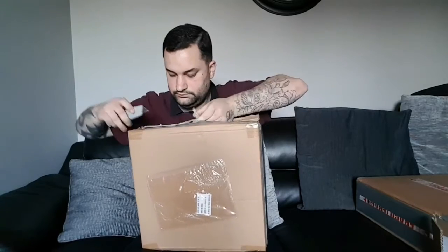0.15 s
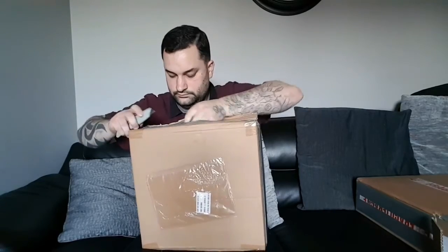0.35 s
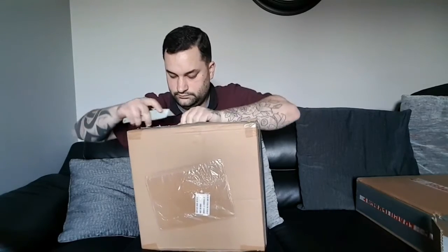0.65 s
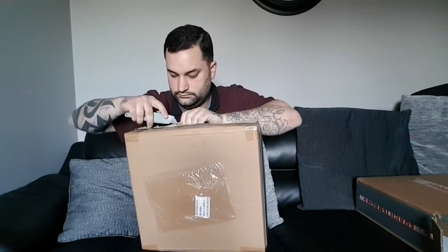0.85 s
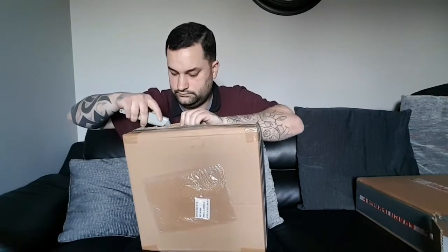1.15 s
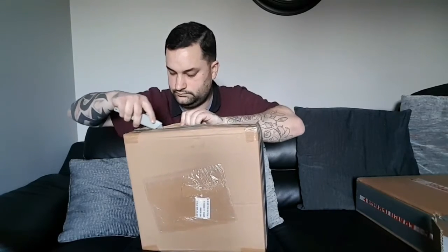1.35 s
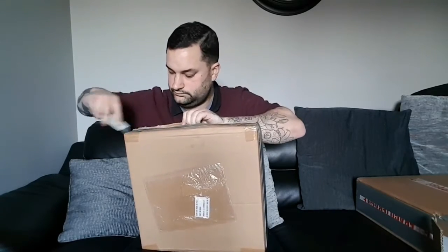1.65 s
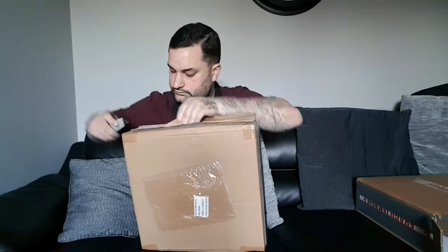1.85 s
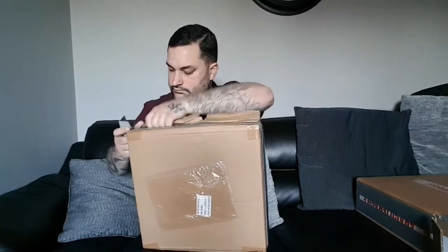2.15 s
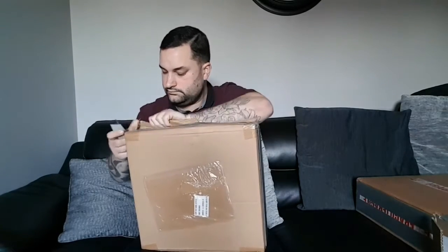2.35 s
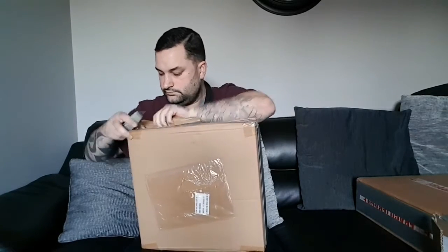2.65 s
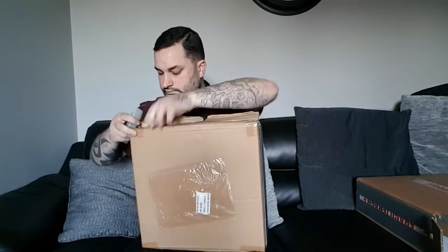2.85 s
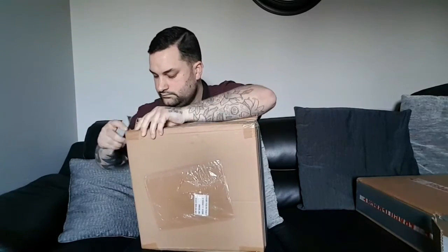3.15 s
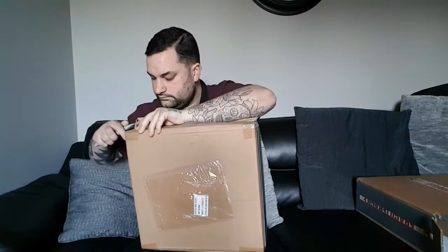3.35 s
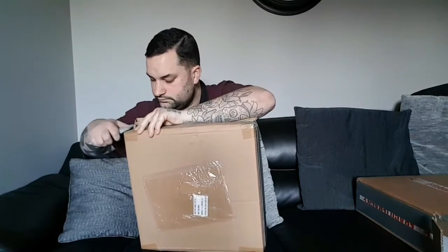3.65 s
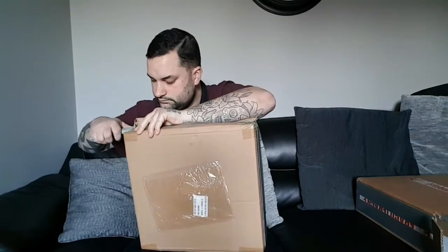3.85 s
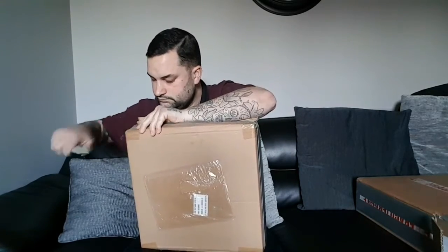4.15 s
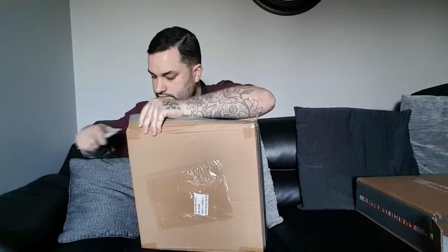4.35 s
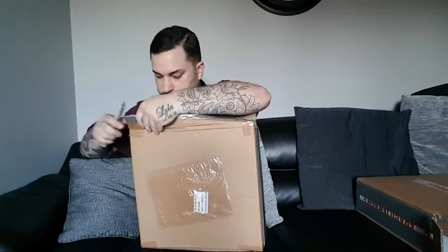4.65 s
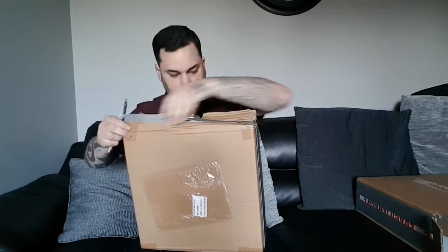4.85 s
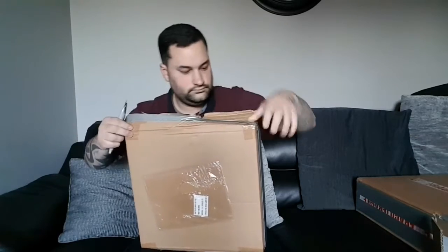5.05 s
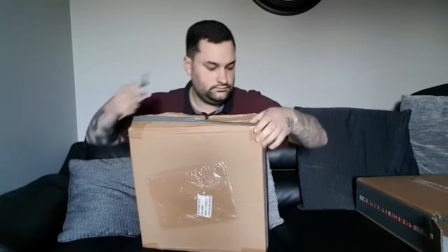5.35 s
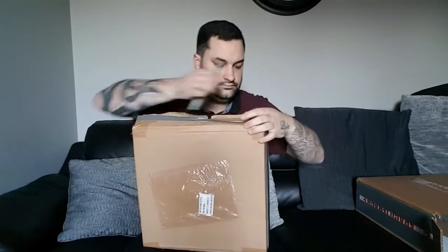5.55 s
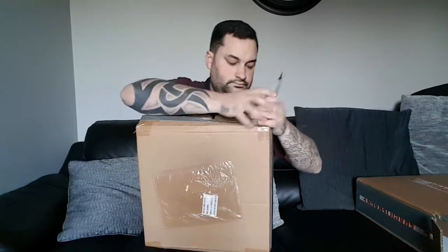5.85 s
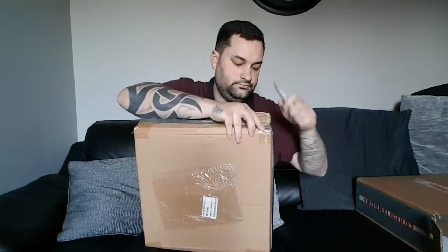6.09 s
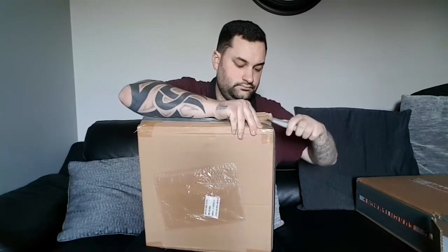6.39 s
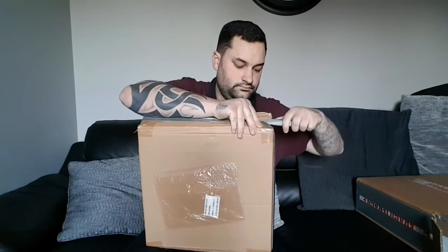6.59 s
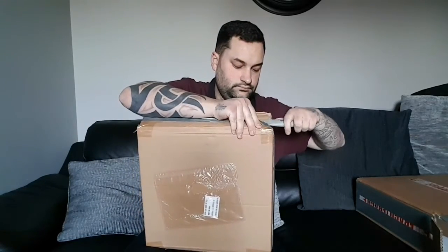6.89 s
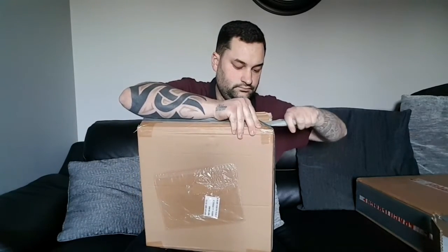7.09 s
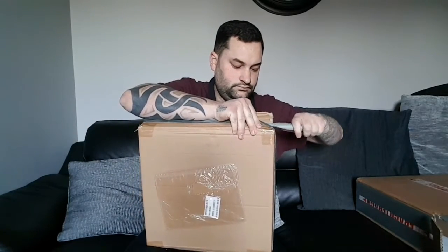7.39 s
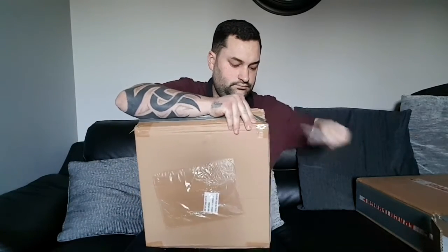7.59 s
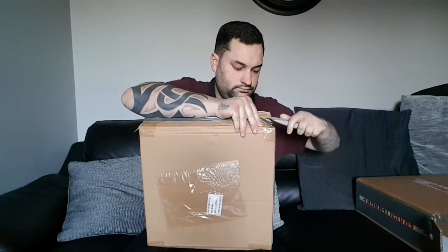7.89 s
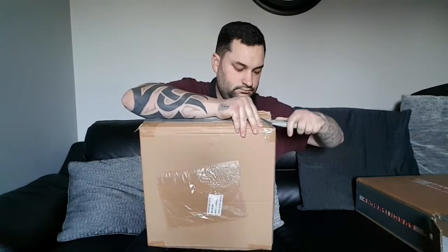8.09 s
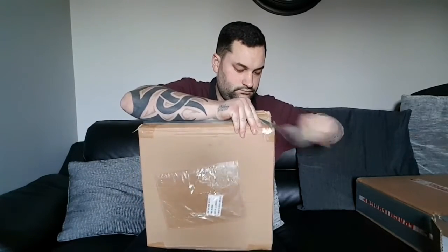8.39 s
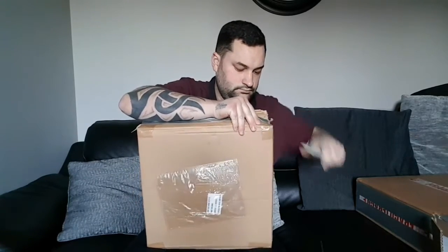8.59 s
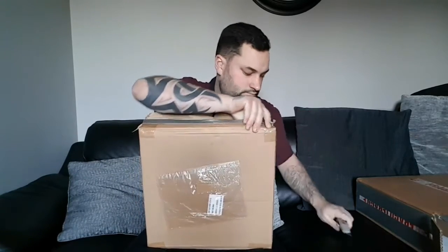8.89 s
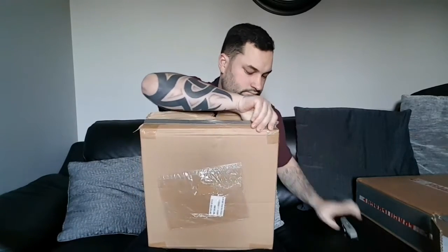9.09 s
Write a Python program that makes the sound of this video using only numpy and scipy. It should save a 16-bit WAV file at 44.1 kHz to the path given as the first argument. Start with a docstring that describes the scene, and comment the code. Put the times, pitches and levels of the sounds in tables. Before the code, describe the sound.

A knife slits packing tape on a large cardboard box, with irregular scrapes, sharp snaps and hollow thuds in a quiet room.

```python
"""Opening a cardboard box

In a furnished living room a knife slits the packing tape of a large box; hands pull and drag the flaps.
Stick-slip friction comes as dense grains, tape and fibres let go in snaps, hands and box land with thuds.
These excite the modes of the box and the room, and reach a two-port microphone a couple of metres away."""
import sys
import numpy as np
from scipy import signal
from scipy.fft import rfft, irfft, next_fast_len
from scipy.io import wavfile

SR = 44100
rng = np.random.default_rng(int(sys.argv[2]) if len(sys.argv) > 2 else 0)


def inscribe(sig):
    """Save sig as 16-bit PCM at rate SR to the path in sys.argv[1].

    A 1-D sig is mono; a 2-D sig holds one channel per row.
    Samples are clipped to [-1, 1] before scaling.
    """
    pcm = np.round(np.clip(np.atleast_2d(sig).T, -1, 1) * 32767)
    wavfile.write(sys.argv[1], SR, pcm.astype(np.int16))


N = 407043
FFT_SIZE = next_fast_len(N + SR)
BIN_HZ = np.maximum(np.arange(FFT_SIZE // 2 + 1) * SR / FFT_SIZE, 1)


def amp(db):
    """Amplitude ratio of a level in decibels."""
    return 10 ** (np.asarray(db) / 20)


def unit_rms(x):
    """Normalisation to an rms of 1."""
    return x / np.sqrt(np.mean(x ** 2) + 1e-20)


def unit_peak(x):
    """Normalisation to a peak of 1."""
    return x / np.abs(x).max()


def over_time(curve):
    """Linear interpolation of (time_s, value) rows, one value a sample."""
    return np.interp(np.arange(N) / SR, *np.transpose(curve))


def at_hz(table, hz, column=1):
    """Interpolation of one column on a logarithmic frequency axis."""
    table = np.array(table)
    return np.interp(np.log(hz), np.log(table[:, 0]), table[:, column])


def band(x, low_hz, high_hz, order=2):
    """Butterworth band-pass with gentle slopes."""
    return signal.sosfilt(signal.butter(order, [low_hz, high_hz], "band", fs=SR, output="sos"), x)


def delayed(x, delay_s):
    """Propagation delay: the same wave, later."""
    return np.pad(x, (round(delay_s * SR), 0))[:N]


def minimum_phase(spectrum):
    """Causal impulse response of a magnitude spectrum, by folding its cepstrum."""
    cepstrum = irfft(np.log(amp(at_hz(spectrum, np.linspace(1, SR / 2, 2049)))))
    cepstrum[1:2048] *= 2
    return irfft(np.exp(rfft(cepstrum[:2049], 4096)))


def diffuse_field():
    """Spatial coherence: noise spectra at the two ports, alike in the bass, nearly unrelated above."""
    # likeness of diffuse sound at the ports: frequency_hz, correlation
    coherence = [(25, 0.097), (60, 0.98), (250, 0.86), (500, 0.63), (1000, 0.075), (2000, 0.063),
                 (5000, 0.11)]
    alike = at_hz(coherence, BIN_HZ)
    mid, side = rfft(rng.standard_normal((2, N)), FFT_SIZE)
    return (np.sqrt(1 + alike) * mid + np.sqrt(1 - alike) * side * [[1], [-1]]) / np.sqrt(2)


def noise_floor(level_db=-63.5):
    """Stationary background noise of the room and the microphone."""
    # relative spectrum of the hush: frequency_hz, density_db
    spectrum = [(15, -21.5), (25, -10.5), (49, -12), (114, -10.5), (217, -15), (335, -13.5), (476, -10),
                (734, -22.5), (2410, -27.5), (6560, -36.5), (7920, -45), (14000, -36), (16000, -29)]
    hush = irfft(diffuse_field() * amp(at_hz(spectrum, BIN_HZ)), FFT_SIZE)[:, :N]
    return amp(level_db) * unit_rms(hush)


def room_reverberation(x):
    """Early reflections, then exponential decay: each band stores energy and returns it as noise."""
    # reflections from sofa, floor and wall: delay_s, gain_db, first_port (whole part: 0 left, 1 right)
    reflections = [(.0042, -9.5, 1), (.0088, -11, 0.086), (.015, -14, 1)]
    # reverberant field against the direct sound: frequency_hz, t60_s, gain_db
    reverberation = [(60, 0.19, -5.5), (150, 0.22, 0.5), (393, 0.14, -7), (1260, 0.33, 0), (3150, 0.31, 2),
                     (7050, 0.32, -2.5), (14000, 0.11, 5.5)]
    out = np.zeros((2, N))
    for delay_s, gain_db, first_port in reflections:
        out[int(first_port)] += amp(gain_db) * delayed(x, delay_s)
        out[1 - int(first_port)] += amp(gain_db) * delayed(x, delay_s + .0002)
    noises = [irfft(diffuse_field(), FFT_SIZE)[:, :N] for _ in range(2)]
    late = delayed(x, .006)
    # half octaves below 200 Hz, quarter octaves above
    edges_hz = np.r_[25 * 2 ** np.arange(0, 3, .5), 200 * 2 ** np.arange(0, 6.7, .25)]
    for k, (low_hz, high_hz) in enumerate(zip(edges_hz, edges_hz[1:])):
        centre_hz = np.sqrt(low_hz * high_hz)
        retained = amp(-120 / (at_hz(reverberation, centre_hz) * SR))  # share of energy, per sample
        energy = signal.lfilter([1 - retained], [1, -retained], band(late, low_hz, high_hz) ** 2)
        carrier = unit_rms(band(noises[k % 2], low_hz, high_hz))  # unrelated in neighbouring bands
        out += amp(at_hz(reverberation, centre_hz, column=2)) * np.sqrt(energy) * carrier
    return out


def box_modes(force):
    """Modal superposition: damped resonators start in phase, which makes the hard front of a knock."""
    # modes of the panels and the air cavity: pitch_hz, gain_db, t60_s
    modes = [(36.2, -14, 0.059), (50.7, -28, 0.05), (72, -3.5, 0.26), (94.6, 3, 0.11), (142, -1, 0.092),
             (154, 0, 0.11), (175, 4, 0.16), (230, -4, 0.015), (264, 2, 0.039), (310, 6, 0.018),
             (358, -2, 0.24), (401.7, 6.5, 0.061), (482, 4.5, 0.013), (525.8, -4.5, 0.12),
             (600, 5.5, 0.053), (660, -4, 0.074), (705, 2.5, 0.049), (783, 5.5, 0.041), (859, -0.5, 0.064),
             (946.6, 0.5, 0.053), (1092, -3, 0.021), (1280, -16.5, 0.45)]
    out = 0
    for pitch_hz, gain_db, t60_s in modes:
        radius, angle = amp(-60 / (t60_s * SR)), 2 * np.pi * pitch_hz / SR
        feedback = [1, -2 * radius * np.cos(angle), radius ** 2]
        out = out + amp(gain_db) * signal.lfilter([0, np.sin(angle)], feedback, force + 1e-18)
    return out


def box_response(low_hz, high_hz):
    """Impulse response of the box to a band-limited click."""
    click = np.arange(SR // 2) == 0
    return box_modes(band(click, low_hz, high_hz))


def surface_responses():
    """Impulse responses of three paths by which a slip is heard: scrape, hiss and fizz."""
    # midrange, treble and top spectra of a slip: frequency_hz, density_db
    scrape = [(500, -27.5), (1000, -3.5), (1600, 1.5), (2200, 1.5), (3200, -3), (4500, -12.5),
              (9000, -30.5)]
    hiss = [(2000, -12), (3600, 0.5), (5000, 2.5), (6400, 7), (7300, -3), (9000, -45.5)]
    fizz = [(6000, -20), (8200, -10), (10000, 1), (12500, -1), (15000, -9), (17000, -11)]
    return [minimum_phase(spectrum) for spectrum in (scrape, hiss, fizz)]


def brief_rings():
    """Damped resonance: a band of noise starts abruptly and decays exponentially."""
    # brief narrow rings, and the broad midrange ring of two knocks on the box:
    # start_s, pitch_hz, width_hz, level_db, t60_s
    resonances = [(.2231, 660, 150, -33.5, 0.21), (0.5664, 2250, 234.3, -37, 0.11),
                  (1.3335, 2100, 130.7, -46.5, 0.076), (1.335, 3220, 150, -56, 0.1),
                  (1.395, 3230, 150, -56, 0.086), (3.421, 1781, 601, -45, 0.11),
                  (5.1385, 1020, 250, -44.5, 0.16), (5.1405, 2121, 101, -56.5, 0.18),
                  (5.8719, 1145, 796.3, -39, 0.081), (6.247, 2100, 51, -64, 0.26),
                  (6.327, 923, 31, -64, 0.45), (6.367, 2770, 31, -71, 0.36),
                  (6.5815, 2220, 108, -60.5, 0.14), (6.5825, 5500, 216, -63, 0.11),
                  (7.5785, 790, 440, -31, 0.13), (7.5805, 2066, 110, -39, 0.37),
                  (7.773, 2030, 150, -58.5, 0.2)]
    t, out = np.arange(SR // 3) / SR, np.zeros(N + SR)
    for start_s, pitch_hz, width_hz, level_db, t60_s in resonances:
        tone = band(rng.standard_normal(len(t)), pitch_hz - width_hz / 2, pitch_hz + width_hz / 2)
        out[round(start_s * SR):][:len(t)] += amp(level_db - 60 * t / t60_s) * unit_rms(tone)
    return out[:N]


def stick_slip(slips_per_s, spread_db, clump_db, clump_hz):
    """Stick-slip force as shot noise: tiny random slips, a few much larger, their sizes in clumps."""
    sizes = amp(spread_db * np.minimum(rng.exponential(1, N), 5)) * rng.choice([-1, 1], N)
    pole = np.exp(-2 * np.pi * clump_hz / SR)
    clumps = unit_rms(signal.lfilter([1], [1, -2 * pole, pole ** 2], rng.standard_normal(N)))
    slipping = rng.random(N) < slips_per_s / SR
    return unit_rms(sizes * slipping * amp(clump_db * clumps))


def friction_envelopes(rise_db_per_s=155, fall_db_per_s=184):
    """Amplitude envelopes of panels, scrape, hiss, fizz and flexing: strokes swell, hold and let go."""
    # hands and sleeves shifting on the card between strokes: time_s, level_db
    handling = [(0.0, -57.5), (0.7, -58), (1.2, -61.5), (1.45, -60), (1.9, -55.5), (2.8, -60), (3.5, -69.5),
                (3.75, -74), (3.98, -80), (4.2, -56), (4.96, -81), (5.5, -65), (5.95, -57), (6.42, -68),
                (7.1, -69.5), (7.8, -65.5), (8.3, -68), (8.7, -114), (9.23, -58.5)]
    # slow flexing of the walls as the box is leaned on: time_s, level_db
    flexing = [(0.0, -70), (0.87, -81), (1.39, -56), (1.8, -75), (2.3, -59), (2.78, -78), (3.13, -55),
               (3.52, -53.5), (3.98, -79), (4.35, -59), (4.68, -77), (5.42, -91), (5.6, -38.5),
               (5.8, -65.5), (6.09, -58), (6.68, -88), (7.17, -61), (7.4, -88), (7.9, -62), (8.33, -77),
               (9.23, -64)]
    # knife strokes, drags of tape and flaps: hold_start_s, hold_s, panels_db, scrape_db, hiss_db
    strokes = [(0.1, 0.32, -54, -62.5, -67.5), (0.441, 0.16, -45.5, -53, -60),
               (0.868, 0.14, -68, -77, -69.5), (1.659, 0.066, -36, -44, -46.5),
               (2.14, 0.064, -52.5, -60.5, -57.5), (2.362, 0.1, -43.5, -46.5, -52),
               (2.55, 0.2, -61.5, -66, -82), (3.0, 0.21, -60, -60, -64.5), (3.33, 0.14, -61, -67, -69.5),
               (4.24, 0.027, -50, -58, -77), (4.42, 0.16, -52.5, -54, -51),
               (4.66, 0.029, -50.5, -54, -56.5), (4.858, 0.017, -45.5, -53.5, -59),
               (5.288, 0.016, -49, -56.5, -59.5), (5.74, 0.049, -67, -70.5, -69),
               (6.07, 0.15, -62, -65, -66.5), (7.16, 0.12, -70, -74.5, -79.5), (7.51, 0.03, -72, -73, -71),
               (7.63, 0.053, -45.5, -58, -62.5), (8.33, 0.04, -70, -77, -75), (8.44, 0.13, -47, -54, -59),
               (8.85, 0.16, -56, -61.5, -66.5)]
    t = np.arange(N) / SR
    shares_db = [[-3.5], [-9.5], [-17.5], [-22]]  # panels, scrape, hiss, fizz
    gains = amp(np.vstack([over_time(handling) + shares_db, over_time(flexing)]))
    for hold_start_s, hold_s, panels_db, scrape_db, hiss_db in strokes:
        release_s = hold_start_s + hold_s
        near = slice(max(round((hold_start_s - .5) * SR), 0), round((release_s + .5) * SR))
        rise_db = rise_db_per_s * (t[near] - hold_start_s)
        fall_db = fall_db_per_s * (release_s - t[near])
        envelope = amp(np.minimum(0, np.minimum(rise_db, fall_db)))
        fizz_db, flex_db = hiss_db - 5.5, panels_db - 14
        gains[:, near] += envelope * amp([[panels_db], [scrape_db], [hiss_db], [fizz_db], [flex_db]])
    return gains


def rubbing():
    """Frictional excitation: one stream of slips feeds four paths; slow flexing drives the low modes."""
    slips = stick_slip(slips_per_s=6000, spread_db=4, clump_db=2.5, clump_hz=70)
    flexing = stick_slip(slips_per_s=1200, spread_db=4.5, clump_db=3, clump_hz=6.4)
    forces = np.array([slips] * 4 + [flexing]) * friction_envelopes()
    responses = [box_response(232, 2540), *surface_responses(), box_response(31, 185)]
    return sum(signal.fftconvolve(force, response / np.linalg.norm(response))[:N]
               for force, response in zip(forces, responses))


def thuds(contact_cycles=1.78):
    """Soft impact: the slower the push and rebound, the lower the modes it excites."""
    # blows of hands and of the box rocking: start_s, peak_db, push_hz
    blows = [(0.057, -58, 121), (0.2232, -19.5, 215), (.62, -63, 60), (1.768, -33, 167),
             (2.009, -37.5, 187), (2.398, -25.5, 150), (2.952, -45, 192), (3.069, -36, 104),
             (3.332, -35.5, 111), (3.63, -58, 40), (4.201, -41, 170), (4.319, -32, 200),
             (4.778, -55.5, 200), (5.086, -26, 172.5), (5.103, -21, 163), (5.128, -34.5, 71),
             (5.549, -44, 200), (5.582, -27.5, 158), (5.637, -43.5, 66), (5.95, -38.5, 70),
             (6.034, -25.5, 246), (6.875, -37, 72), (7.46, -42, 237), (7.579, -26, 215), (7.59, -47, 55),
             (7.69, -39.5, 222), (8.009, -29, 72), (8.1, -45, 68), (8.484, -23.5, 137), (8.499, -39, 53)]
    out = np.zeros(N + SR)
    for start_s, peak_db, push_hz in blows:
        cycles = np.arange(SR // 3) * push_hz / SR
        contact = np.sin(np.pi * cycles / contact_cycles) * (cycles < contact_cycles)
        thud = box_modes(np.sin(2 * np.pi * cycles) * contact)
        out[round(start_s * SR):][:len(thud)] += amp(peak_db) * unit_peak(thud)
    return out[:N]


def snaps(clean_break_s=0.0056):
    """Fracture: one sharp release and a rattle of fibres; the quicker the tear, the cleaner the break."""
    # tape and fibre snaps, knife knocks: start_s, ring_db, ring_hz, crack_db, treble_db, tear_s
    fractures = [(0.0534, -31.5, 600, -54, -70, 0.007), (0.1033, -26.5, 514, -33.5, -37, 0.004),
                 (0.2145, -25, 600, -30, -40, 0.0058), (0.2226, -12, 292, -40, -34.5, 0.0022),
                 (0.4383, -24, 760, -28, -36, 0.0037), (0.4924, -24.5, 358, -31, -48, 0.0063),
                 (0.4586, -38, 700, -36, -43, 0.002), (0.5155, -22, 600, -42, -44, 0.0016),
                 (0.5658, -28.5, 900, -23, -29.5, 0.002), (0.894, -47, 713, -38.5, -42, 0.016),
                 (0.984, -38, 400, -53, -64, 0.0054), (1.1028, -39, 305, -40, -42.5, 0.0034),
                 (1.279, -36, 288, -45, -66, 0.0056), (1.335, -34.5, 988, -34.5, -40.5, 0.0042),
                 (1.3955, -34.5, 338, -30.5, -43, 0.0028), (1.491, -19.5, 747, -20, -21, 0.0038),
                 (1.7212, -21.5, 650, -20, -23.5, 0.0042), (1.7689, -20.5, 261, -21.5, -46, 0.0036),
                 (1.987, -39.5, 630, -39, -39, 0.0063), (2.1341, -35, 253, -50, -57, 0.01),
                 (2.2932, -32, 326, -57, -63, 0.006), (2.3276, -32, 395, -47, -50, 0.0044),
                 (2.348, -40, 690, -25, -21.5, 0.002), (2.3538, -23.5, 400, -18.5, -23.5, 0.0069),
                 (2.3998, -12.5, 385, -12.5, -18.5, 0.0039), (2.6314, -35, 666, -35, -51, 0.0043),
                 (2.7763, -35, 432, -34, -33.5, 0.0088), (2.9403, -44, 250, -46, -37, 0.0037),
                 (2.9555, -25, 264, -35, -36.5, 0.0047), (3.0125, -28.5, 264, -38, -57, 0.0051),
                 (3.0685, -29.5, 332, -36, -62, 0.0033), (3.4266, -36, 1160, -34.5, -41, 0.0037),
                 (3.69, -51, 500, -69, -78, 0.015), (3.8902, -47, 400, -50.5, -74, 0.0098),
                 (4.0132, -41.5, 463, -47, -55, 0.0044), (4.107, -29, 433, -37.5, -46, 0.0054),
                 (4.137, -27.5, 415, -36, -38.5, 0.0079), (4.168, -25, 500, -34, -39, 0.01),
                 (4.179, -27, 700, -30, -35, 0.003), (4.198, -14, 450, -22.5, -22.5, 0.0084),
                 (4.3148, -30, 600, -28.5, -29, 0.0033), (4.3207, -18, 396, -29, -43, 0.0045),
                 (4.4136, -29.5, 371, -25, -24, 0.041), (4.45, -23, 705, -21.5, -18, 0.0073),
                 (4.51, -18.5, 1280, -11.5, -22.5, 0.0024), (4.5494, -16, 740, -22, -23, 0.0048),
                 (4.7696, -29.5, 644, -24, -25, 0.0063), (4.7845, -15, 600, -14, -33, 0.0033),
                 (5.1387, -35.5, 328, -33, -39.5, 0.0036), (5.6922, -39, 264, -45, -64, 0.0045),
                 (5.8668, -21.5, 720, -37.5, -58, 0.00077), (5.9551, -30, 764, -37.5, -47, 0.006),
                 (6.0395, -24.5, 245, -43, -32, 0.004), (6.3546, -44.5, 915, -46, -65, 0.0058),
                 (6.465, -47.5, 300, -57, -70, 0.0047), (6.583, -74, 503, -49, -56, 0.0027),
                 (6.6766, -43, 250, -47, -53, 0.0051), (6.705, -70, 500, -70, -49, 0.002),
                 (6.754, -42.5, 450, -48, -48, 0.006), (6.852, -70, 500, -68, -54, 0.002),
                 (7.1235, -50, 409, -47, -50, 0.012), (7.1435, -36.5, 810, -36.5, -39, 0.0066),
                 (7.1658, -34.5, 470, -40.5, -38, 0.014), (7.2434, -27.5, 372, -31, -27.5, 0.005),
                 (7.448, -36.5, 500, -39, -41, 0.009), (7.4607, -22, 360, -28.5, -29, 0.0048),
                 (7.4708, -18.5, 507, -22.5, -28.5, 0.0028), (7.575, -12.5, 504, -19, -19.5, 0.010),
                 (7.77, -53, 900, -42, -42, 0.003), (8.2827, -30, 427, -32.5, -42.5, 0.0051),
                 (8.3514, -33, 471, -45, -52, 0.0031), (8.4021, -31, 420, -34.5, -39, 0.023),
                 (8.449, -24, 710, -37, -32, 0.0042), (8.486, -17, 355, -21, -26, 0.0062),
                 (8.4959, -40, 350, -15, -16.5, 0.005), (8.7601, -33.5, 518, -39, -48, 0.0041),
                 (8.8128, -47, 400, -39, -41, 0.0015), (9.026, -62, 400, -62, -54, 0.0015),
                 (9.1, -49, 600, -46, -66, 0.002), (9.147, -43.5, 245, -48, -49, 0.004)]
    t = np.arange(SR // 8) / SR
    forces = np.zeros((3, N + len(t)))  # scrape, hiss, fizz
    knocks = np.zeros(N + SR)
    panels = box_response(201, 3300)[:SR // 5]
    for start_s, ring_db, ring_hz, crack_db, treble_db, tear_s in fractures:
        start = round(start_s * SR)
        sharp_share = 1 / (1 + (tear_s / clean_break_s) ** 2)
        noise = rng.standard_normal(len(t))
        rattle = noise * np.abs(noise) * np.sqrt(t) * np.exp(-t / tear_s)
        burst = rattle / np.linalg.norm(rattle) * (1 - sharp_share) * 2
        burst[0] = sharp_share
        forces[:, start:start + len(t)] += burst * amp([[crack_db], [treble_db], [treble_db - 5.5]])
        forces[2, start] += sharp_share * amp(treble_db - 8)  # the release is brighter than the rattle
        # where the snap sits decides which panel modes answer most
        ring = band(panels, ring_hz / 1.7, ring_hz * 1.7, order=1)
        knock = signal.fftconvolve(burst, unit_peak(ring))
        knocks[start:start + len(knock)] += amp(ring_db) * knock
    cracks = sum(signal.fftconvolve(force, unit_peak(response))[:N]
                 for force, response in zip(forces, surface_responses()))
    return knocks[:N] + cracks


def scene():
    """Superposition of direct sound, with an arrival-time difference between ports, room and noise."""
    # lag of the left port as the hands move along the box: time_s, lag_samples
    left_lag = [(0, 1), (1, 2), (4.9, 3), (5.1, -4), (9.3, -5)]
    direct = rubbing() + snaps() + thuds() + brief_rings()
    lag_samples = np.round(over_time(left_lag)).astype(int)
    left = direct[np.clip(np.arange(N) - lag_samples, 0, N - 1)]
    return np.array([left, direct]) + room_reverberation(direct) + noise_floor()


def record(dry):
    """Linear filtering: a brighter left port, a limited bandwidth; then a small converter offset."""
    # difference in sensitivity of the ports: frequency_hz, left_minus_right_db
    imbalance = [(60, -2), (180, -1), (550, 0), (1650, 1), (4970, 5), (15000, 4.5)]
    tilt = amp(at_hz(imbalance, BIN_HZ) / 2 * [[1], [-1]])
    tilted = irfft(rfft(dry, FFT_SIZE) * tilt, FFT_SIZE)[:, :N]
    bass_cut = signal.butter(1, 45, "high", fs=SR, output="sos")  # gentle cut of the rumble below 45 Hz
    top_cut = signal.cheby2(16, 70, 16300, fs=SR, output="sos")
    return signal.sosfilt(top_cut, signal.sosfilt(bass_cut, tilted)) - .0005


dry = scene()
out = record(dry)
inscribe(out)
```